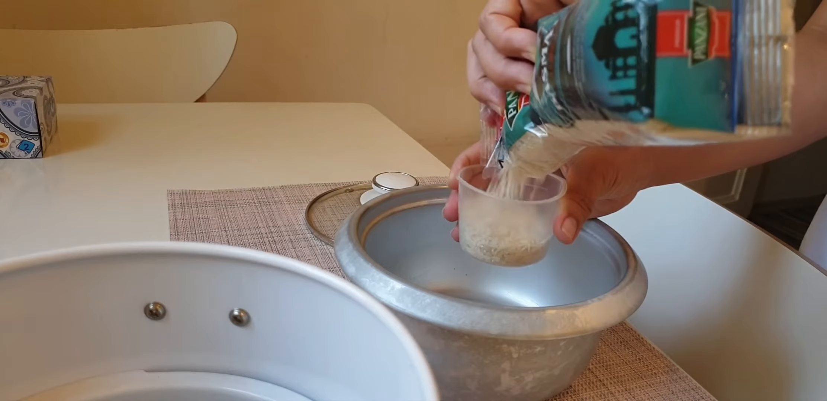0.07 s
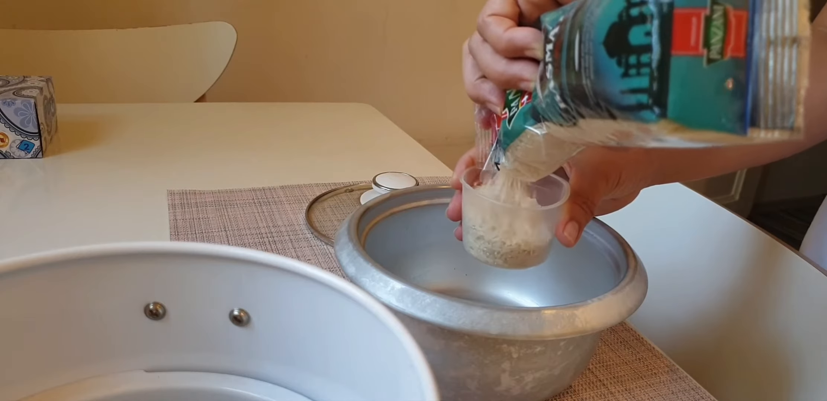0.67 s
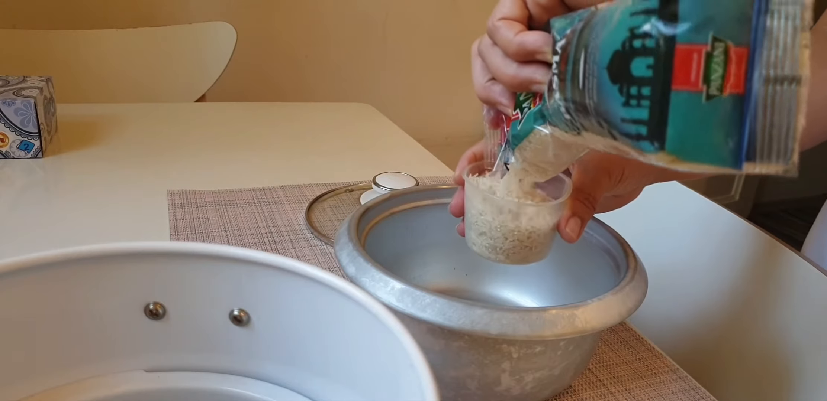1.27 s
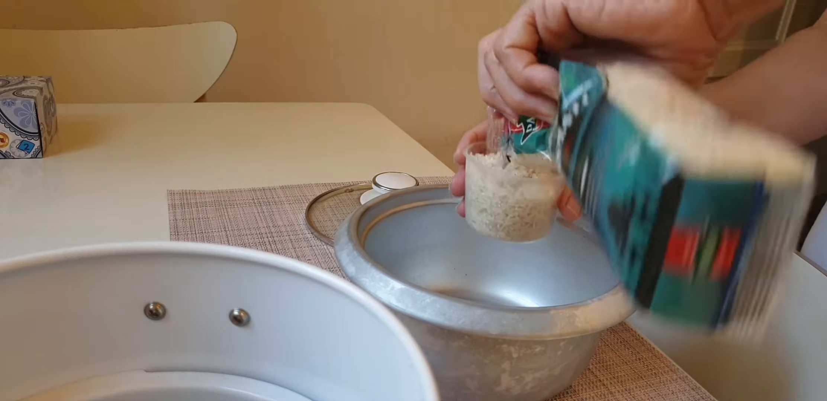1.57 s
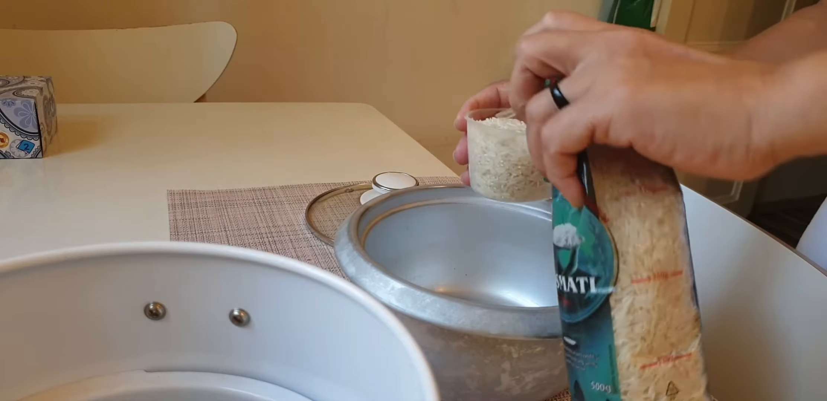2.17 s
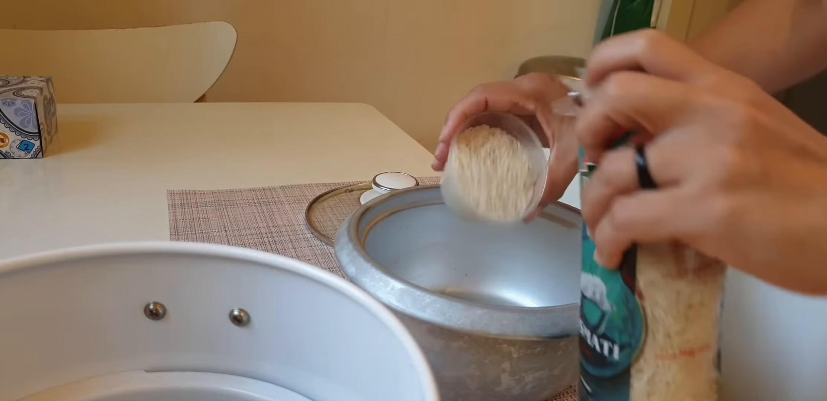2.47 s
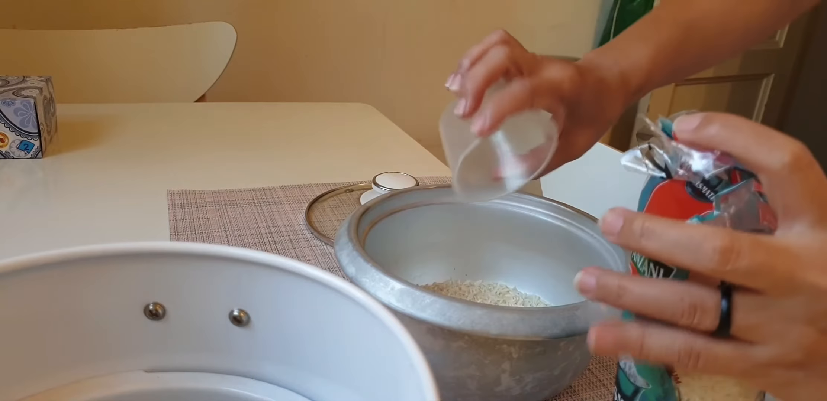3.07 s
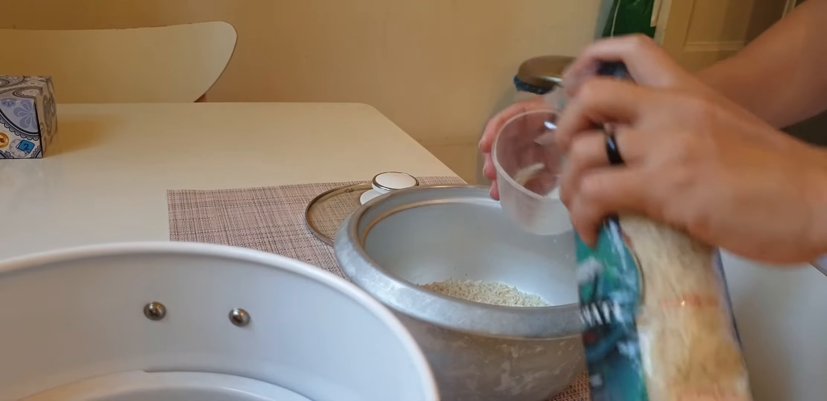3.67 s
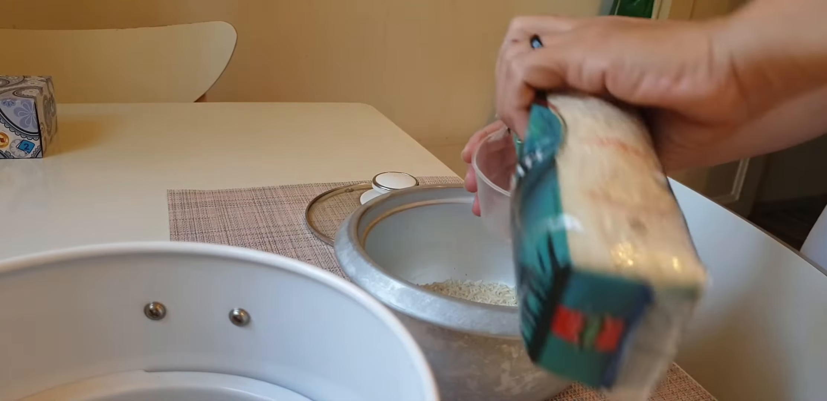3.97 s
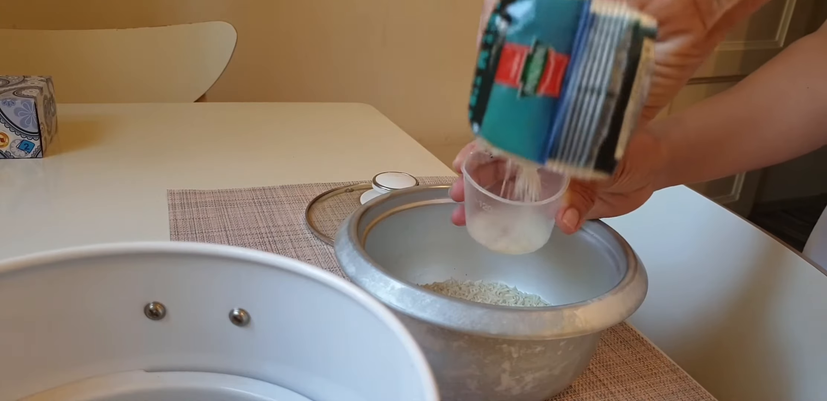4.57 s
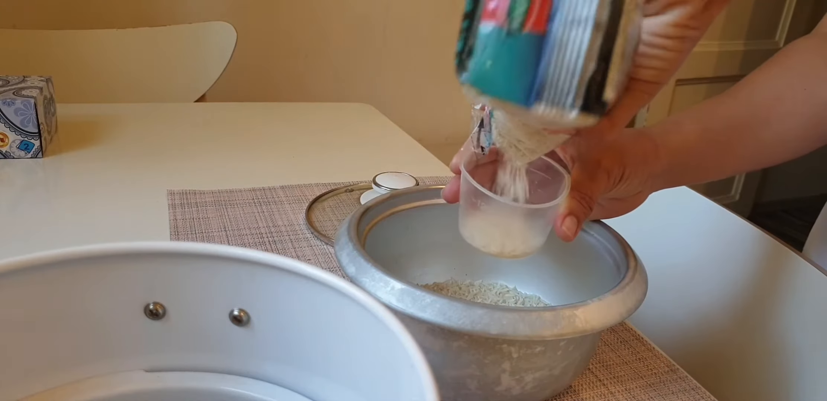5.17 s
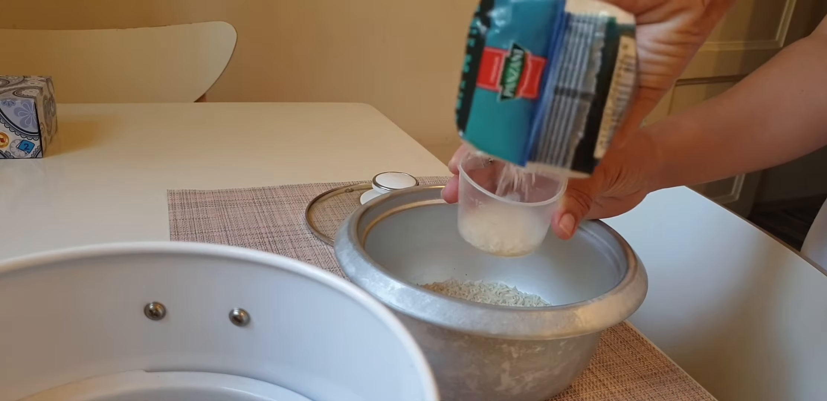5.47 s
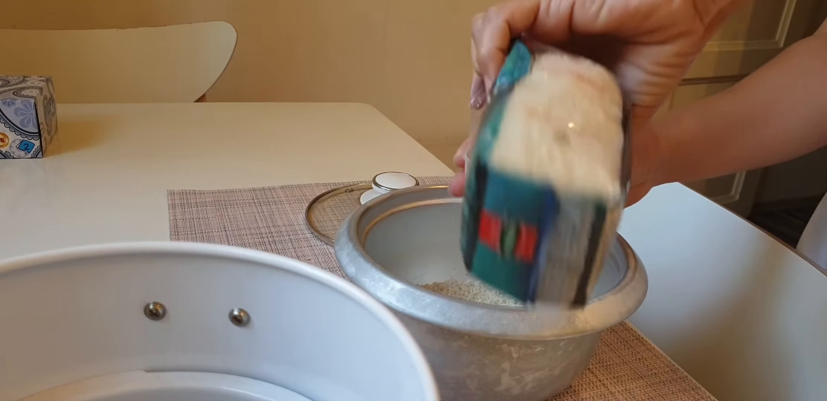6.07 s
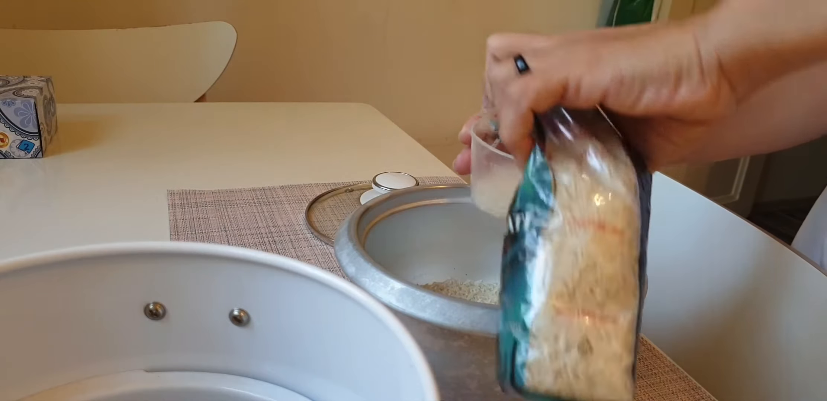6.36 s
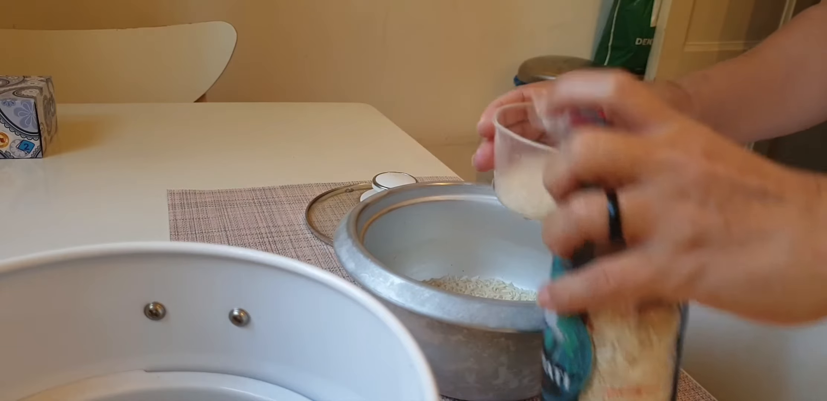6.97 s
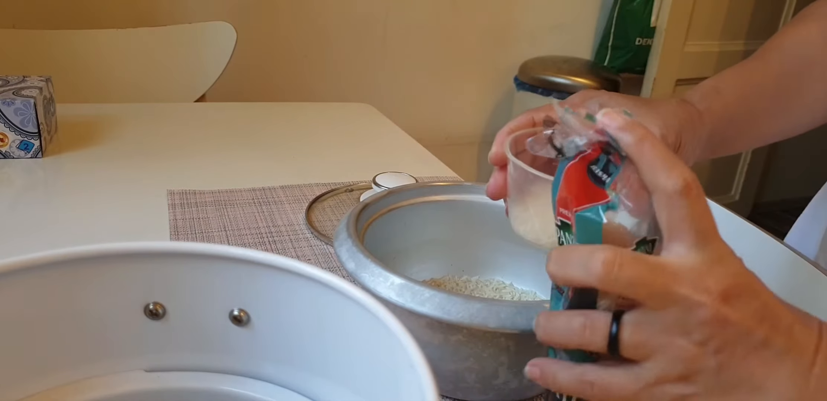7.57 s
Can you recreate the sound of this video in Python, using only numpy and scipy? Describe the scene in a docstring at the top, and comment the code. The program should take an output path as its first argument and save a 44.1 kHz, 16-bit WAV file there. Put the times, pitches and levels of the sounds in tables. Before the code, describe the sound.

Dry rice runs from a plastic bag into a plastic cup with a fine, bright patter while the bag crinkles. The cupful is tipped into an empty metal pot with a brief ringing hiss. More rice rattles into the empty cup and softens as it fills, then the bag is set down with crackles and dull thuds. The stereo microphone is close, in a quiet kitchen with a faint appliance hum.

```python
"""Pouring rice in a small kitchen

A stereo microphone stands close to the hands at the table of a quiet kitchen. Dry rice runs from a
plastic bag into a plastic cup, is tipped into an empty metal pot, and the cup is filled again.
Thousands of grain impacts hiss on the heap and ring the bare cup and pot until the rice covers them.
The bag crinkles in the hand and is set down; an appliance hums faintly behind it all."""
import sys
import numpy as np
from scipy import signal
from scipy.fft import rfft, irfft
from scipy.io import wavfile
from scipy.ndimage import uniform_filter1d

SR = 44100
rng = np.random.default_rng(int(sys.argv[2]) if len(sys.argv) > 2 else 0)


def put_to_file(sound):
    """Save the sound as 16-bit audio at rate SR, in the file named by the first command-line argument."""
    columns = np.atleast_2d(sound).T  # one column per channel
    safe = np.clip(columns, -1, 1)
    whole_steps = np.round(safe * 32767)
    wavfile.write(sys.argv[1], SR, whole_steps.astype(np.int16))


N = 344862
TIME = np.arange(N) / SR

# resonances of the cup's wall: pitch_hz, width_hz, level_db
CUP_WALL_MODES = [(726, 72, 0.5), (1260, 160, 3), (1430, 110, 10), (1540, 130, 5), (1800, 81, -2),
                  (1950, 61, -11)]
# bright spectrum of a small crease snapping in the bag's film: frequency_hz, level_db
SNAP_SPECTRUM = [(300, -59.5), (2500, -38), (5000, -6), (7700, -5), (9000, 4.5), (10800, 8), (12500, 7),
                 (15500, 1.5)]


def stream():
    """Rice falling on rice, in the cup or back down the bag: a fine, bright patter."""
    # pours: start_s, attack_s, hold_s, release_s, level_db
    pours = [(0, 0.00074, 1.28, 0.87, -49), (1.7, 0.18, 0.04, 0.15, -54.5), (3.92, 0.14, 0.29, .1, -56.5),
             (4.27, 0.19, 0.019, 1.01, -39.5), (5.2, 0.1, 0.91, 0.32, -53)]
    # a grain striking the heap: frequency_hz, level_db
    heap_spectrum = [(350, -63), (800, -13), (1500, -7), (3000, -4.5), (5600, -5), (7700, -7.5),
                     (9000, -1.5), (10200, 0), (12000, -1), (14500, -7)]
    impacts = grains(per_s=7000, scatter_db=4, clump_db=1)
    return undb(6) * gestures(pours, rise=0.9, fall=1.15) * convolve(impacts, colour(heap_spectrum))


def spurts():
    """Rice ticks over the bag's lip unevenly, in bright little rushes."""
    # start_s, attack_s, hold_s, release_s, level_db
    rushes = [(0.11, .004, 0.02, 0.024, -39.5), (0.52, 0.0034, 0.028, 0.052, -44),
              (0.665, 0.01, 0.011, 0.018, -40.5), (0.96, .004, 0.025, 0.073, -39.5),
              (1.09, 0.022, 0.023, 0.027, -43), (1.28, 0.012, .005, .02, -44),
              (1.66, 0.025, 0.015, 0.04, -40.5), (5.21, 0.15, 0.14, 0.099, -43.5),
              (5.66, 0.013, 0.0093, 0.013, -55), (6.08, 0.0054, 0.018, 0.019, -41),
              (6.18, 0.049, 0.076, .06, -44)]
    return gestures(rushes, rise=0.29, fall=3.3) * film_ticks(per_s=350, scatter_db=0.5, clump_db=2.5)


def slide():
    """Rice creeps along the thin plastic of the tilted bag and cup: a duller, coarser rustle."""
    # start_s, attack_s, hold_s, release_s, level_db
    tilts = [(0, 0.00033, 0.037, 0.054, -46.5), (0, 0.17, 0.44, 0.77, -54), (.7, 0.16, 0.27, 0.66, -50.5),
             (2.32, 0.034, 0.036, 0.3, -61), (2.39, 0.21, 0.067, 0.13, -39.5),
             (2.98, 0.0081, 0.027, 0.36, -44.5), (3.4, 0.016, 0.018, 0.49, -60),
             (3.74, 0.083, 0.2, .1, -59.5), (3.92, 0.023, 0.074, 0.58, -51), (5.08, 0.2, .03, 0.89, -48.5),
             (6.22, 0.041, .01, 0.17, -64), (6.35, 0.28, 0.035, .1, -59),
             (6.86, 0.035, 0.072, 0.048, -51.5), (6.99, 0.038, 0.079, 0.11, -38),
             (7.08, 0.058, 0.022, 0.86, -42), (7.55, 0.082, 0.14, 0.12, -61)]
    # grains on plastic: frequency_hz, level_db
    rustle_spectrum = [(120, -4.5), (400, -2.5), (750, -5.5), (1100, -3.5), (1550, 1.5), (2300, -2),
                       (2900, -2), (3800, -4.5), (5500, -6.5), (7700, -11), (10500, -6.5), (14500, -8)]
    impacts = grains(per_s=7000, scatter_db=0.5, clump_db=2.5)
    return undb(2.5) * gestures(tilts, rise=1.7, fall=2) * convolve(impacts, colour(rustle_spectrum))


def skid():
    """The tipped cupful gathers speed and patters along the cup's wall."""
    flow = undb(-41) * shape(start=2.47, attack=0.14, hold=0.082, release=0.06, rise=1.2)
    return flow * convolve(grains(per_s=2500, scatter_db=2, clump_db=1.5), ring(CUP_WALL_MODES))


def rice_into_pot():
    """The cupful hits bare metal with a bright splash, and the growing heap muffles the ring."""
    # resonances of the pot: pitch_hz, width_hz, level_db
    pot_modes = [(637, 25, 3), (738, 24, 4.5), (807, 55, -5.5), (1004, 41, -4.5), (1277, 47, -2.5),
                 (1395, 60, -9), (1480, 54, 0), (1830, 18, 9), (2100, 35, -10), (2410, 18, 9.5),
                 (2520, 52, 1), (2570, 36, -4), (2900, 55, -1), (3200, 40, -11), (3320, 36, 2),
                 (3580, 20, 4), (4140, 50, -7), (4290, 77, 1), (4460, 56, -1.5), (4530, 58, 0),
                 (4680, 35, 4.5), (5260, 22, -5), (5460, 50, -3), (5580, 54, 3), (5900, 60, -1),
                 (6080, 70, -0.5), (6250, 80, 2), (6650, 40, -2), (6860, 45, 2), (7070, 45, 2),
                 (7200, 90, -2), (7850, 50, 2.5), (7900, 36, -3), (8400, 60, 0), (8460, 60, 0),
                 (8996, 35, 10), (9180, 46, 6), (9730, 38, 13.5), (9927, 40, 6), (10000, 40, 9),
                 (10270, 84, 15.5), (10270, 45, 13), (10800, 80, 12), (11400, 110, 12.5), (11600, 51, 14),
                 (12050, 180, 7.5), (12110, 100, 9.5), (12000, 60, 11), (12916, 45, 5), (13700, 88, 5)]
    # rice landing on rice in the pot: frequency_hz, level_db
    hiss_spectrum = [(200, -37), (700, -47.5), (2000, -36), (5000, -22), (7700, -18), (9000, -6),
                     (10300, -2.5), (12200, -5), (13200, 1.5), (14500, -5)]
    # clumps that land all at once: start_s, level_db
    slaps = [(2.7156, 1), (2.739, -0.5), (2.778, 11.5)]
    lands_s, swell_s, cover_s = 2.7165, 0.048, 0.16
    first_grains_db, cover_db = -6, -4  # relative to the bulk; to the bare metal
    swell = np.clip((TIME - lands_s) / swell_s, 0, 1)
    covered = np.clip((TIME - lands_s - swell_s) / cover_s, 0, 1)
    flow = shape(lands_s, attack=0.0013, hold=swell_s, release=0.48, fall=2.7)
    flow *= undb(-19.5 + first_grains_db * (1 - swell))
    on_rice = flow * grains(per_s=9000, scatter_db=0.3, clump_db=0.4)
    for start_s, level_db in slaps:
        add(on_rice, start_s, undb(level_db) * crack(t60=0.012, size=1000))
    on_metal = flow * undb(cover_db * covered) * grains(per_s=5000, scatter_db=2.2, clump_db=1)
    metal = 0
    for share in wander(count=3, size=1100):  # each spot struck favours other modes
        modes = [(hz, width, db + 1.5 * rng.standard_normal()) for hz, width, db in pot_modes]
        signs = rng.choice([-1, 1], len(modes))
        metal += convolve(on_metal * share, ring(modes, signs=signs))
    hiss = convolve(on_rice, colour(hiss_spectrum))
    return undb(3) * hiss + undb(3.5) * band(metal, 520, 17000)


def rice_into_cup():
    """Grains patter and clumps knock in the empty cup, covering first its bottom, then its wall."""
    # clumps that land all at once: start_s, level_db
    landings = [(4.282, 35), (4.303, 30), (4.324, 29), (4.347, 28), (4.367, 28), (4.379, 25), (4.416, 22),
                (4.434, 20), (4.462, 28), (4.495, 21), (4.529, 28.5), (4.572, 34), (4.58, 24), (4.612, 21),
                (4.639, 26), (4.662, 27), (4.713, 27), (4.763, 29), (4.8, 34.5), (4.836, 31.5), (4.85, 29),
                (4.883, 31), (4.908, 30.5), (4.935, 25), (4.96, 24), (4.984, 25), (5.006, 28.5),
                (5.055, 23), (5.15, 26), (5.211, 32)]
    # resonances of the thin bottom: pitch_hz, width_hz, level_db
    bottom_modes = [(1035, 180, -5), (1820, 78, -28), (2920, 230, -25), (3750, 320, -8), (4220, 260, -11),
                    (5870, 520, -5.5), (9900, 2500, -7.5), (12400, 1300, -10)]
    lands_s = 4.281
    patter = grains(per_s=5000, scatter_db=2.2, clump_db=1.2)
    clumps = np.zeros((2, N))
    for start_s, level_db in landings:
        add(clumps, start_s, undb(level_db) * crack(t60=0.021, size=1500))
    impacts = undb(-5) * patter + clumps
    on_bottom = undb(-37) * shape(lands_s, attack=0.17, hold=0.12, release=0.98, rise=0.12, fall=2.24)
    on_wall = undb(-43.5) * shape(lands_s, attack=0.49, hold=0.2, release=0.6, rise=0.086, fall=2.4)
    on_centre = undb(-45) * shape(lands_s, attack=0.00027, hold=0.24, release=0.31, fall=1.2)
    # the note of the bottom's centre sags as the rice loads it
    note_hz, steady_s, sag_hz_per_s = 738, 0.12, 170
    loaded_s = np.clip(TIME - lands_s - steady_s, 0, 0.55)
    note = glide(impacts * on_centre, note_hz - sag_hz_per_s * loaded_s, width_hz=55)
    bottom = convolve((patter + undb(-5) * clumps) * on_bottom, ring(bottom_modes))
    wall = convolve(impacts * on_wall, ring(CUP_WALL_MODES))
    # so small a cup radiates hardly any bass
    bass_cut = signal.butter(10, 615, "high", fs=SR, output="sos")
    return signal.sosfilt(bass_cut, bottom + wall + note)


def crinkles(size=3000):
    """Each crease of the bag cracks, shakes the rice into a trail of ticks and swings a panel of film."""
    # creases snapping over: start_s, snap_db, fold_db, panel_hz, panel_db
    creases = [(0.112, -11, -21, 1750, -56), (0.178, -11, -25, 1700, -51), (0.518, -12, -41, 1540, -58),
               (0.5913, -12, -34, 1700, -55), (0.6911, -14, -32, 1700, -57), (0.7594, -18, -28, 1700, -44),
               (0.798, -3, -10, 1330, -30.5), (0.801, -4, -18, 1500, -41), (0.8708, -5.5, -16, 1940, -43),
               (0.9615, -11, -26, 1880, -39), (0.9706, -12, -30, 1880, -48), (1.2647, -11, -26, 1760, -41),
               (1.395, -24, -28, 1620, -39), (1.3675, -11, -38, 1680, -57),
               (1.4859, -3.5, -9.5, 2350, -24.5), (1.6126, -11, -32, 1625, -48),
               (1.6862, -5, -32, 2090, -41), (1.8573, -13, -19, 4800, -31.5), (1.984, -34, -20, 1700, -42),
               (2.0504, -34, -16, 1580, -55), (2.1082, -14, -20, 2530, -38), (2.4685, -8, -17, 1220, -42),
               (2.4737, -13, -19, 1600, -33), (3.08, -9, -10.5, 1760, -30.5),
               (3.485, -12.5, -26, 965, -44.5), (3.529, -14, -10.5, 1390, -24.5),
               (3.714, -15, -20.5, 1730, -24.5), (4.128, -12, -29, 2160, -31.5),
               (4.1618, -21, -8.5, 980, -37), (4.1954, -9, -12, 1800, -36.5),
               (5.3484, -17, -13.5, 1900, -32), (5.421, -10, -15, 2060, -31), (5.4363, -11, -10, 1910, -51),
               (5.6196, -25, -34, 1480, -36), (5.647, -28, -37, 1550, -35.5),
               (5.7562, -13.5, -27, 1700, -49), (5.8157, -14, -23.5, 1746, -50),
               (5.838, -9, -26, 1690, -58), (5.879, -8, -32, 1530, -40), (5.926, -6.5, -21, 1420, -41),
               (6.264, -12, -22, 2310, -44), (6.2698, -12.5, -14, 2240, -33.5),
               (6.359, -11, -40, 2200, -61), (6.4973, -15.5, -23, 1340, -69), (6.563, -9, -17, 2000, -62),
               (6.779, -42, -28.5, 1540, -40), (6.797, -38, -22, 2520, -41), (6.8688, -25, -23, 1690, -30),
               (6.903, -9.5, -15, 1660, -32), (6.993, -20, -20, 1500, -33),
               (6.9978, -4.5, -2.5, 1640, -20.5), (7.0257, -1, -21, 1610, -29),
               (7.039, 0.5, -8.5, 4600, -23), (7.2491, -2, -4, 1660, -30), (7.2514, -1, -25, 1700, -38),
               (7.3311, 1, -9, 1890, -24.5), (7.3347, -12, -20, 1850, -45), (7.405, -33, -30, 3000, -37),
               (7.5962, -21, -22, 1690, -28.5), (7.6144, -16.5, -16, 1670, -38),
               (7.7554, -28, -13, 1620, -57)]
    # a long fold sounds lower than a small crease: frequency_hz, level_db
    fold_spectrum = [(200, -27), (900, -13), (1600, 4), (2200, -3.5), (3000, 6), (4200, 5.5), (5500, 6.5),
                     (7500, -1.5), (10000, 4), (15000, -6.5)]
    snaps, folds, panels = np.zeros((3, 2, N))
    for start_s, snap_db, fold_db, panel_hz, panel_db in creases:
        pan_db = 1 + 0.5 * rng.standard_normal()  # left minus right
        sides = undb(np.array([[pan_db], [-pan_db]]) / 2)
        trail = undb(-48) * burst(0.26, size) * rng.standard_normal((2, size))
        snap = buckle(jerk_t60=0.0037, chatter_db=-8.5, size=size)
        add(snaps, start_s, sides * undb(snap_db) * (snap + trail))
        add(folds, start_s, sides * undb(fold_db) * buckle(jerk_t60=0.003, chatter_db=-7, size=size))
        add(panels, start_s, sides * undb(panel_db + 1.5) * flex(panel_hz, t60=0.0055))
    return convolve(snaps, colour(SNAP_SPECTRUM)) + convolve(folds, colour(fold_spectrum)) + panels


def crackle():
    """Sparse tiny creases give way while the hand shifts on the bag."""
    # start_s, attack_s, hold_s, release_s, level_db
    squeezes = [(0, 0.14, 0.95, .3, -53), (2.46, 0.0067, 0.036, 0.054, -39), (2.52, 0.06, 0.11, 1, -37),
                (3.36, 0.039, 0.024, 0.11, -54.5), (4.0, .2, 0.69, .2, -73),
                (5.22, 0.15, 0.044, 0.21, -39.5), (5.72, 0.096, 0.55, 0.21, -43.5),
                (6.5, 0.22, 0.19, 0.055, -62), (6.99, 0.03, 0.3, 0.15, -47)]
    clicks = convolve(grains(per_s=600, scatter_db=3, clump_db=2.5), colour(SNAP_SPECTRUM))
    ticks = film_ticks(per_s=70, scatter_db=3.5, clump_db=3)
    return gestures(squeezes, rise=0.62, fall=3.2) * (undb(-8) * clicks + undb(-6) * ticks)


def knocks():
    """Short hollow knocks, and dull thuds from the weight of the rice."""
    # knocks of the cup, of rice landing and of the bag being set down: start_s, level_db, pitch_hz
    hollow_knocks = [(1.782, -46, 1380), (2.598, -27, 1470), (2.658, -25, 1440), (2.715, -24.5, 1450),
                     (2.739, -29, 1230), (3.056, -33, 1390), (3.159, -42, 890), (3.173, -28.5, 1356),
                     (3.2, -37.5, 880), (3.242, -42.5, 1120), (3.449, -41, 1570), (3.761, -39, 840),
                     (3.931, -43.5, 1310), (5.346, -34.5, 950), (6.017, -39.5, 1120), (6.689, -39.5, 1560),
                     (7.0663, -21, 1500), (7.0881, -29, 1590), (7.097, -29, 1650), (7.104, -37, 1430),
                     (7.119, -41, 1700), (7.175, -30.5, 1600), (7.207, -35, 1940), (7.272, -31, 1750),
                     (7.276, -26, 1560), (7.287, -29, 1910), (7.321, -32, 940), (7.367, -38, 1800),
                     (7.633, -38.5, 660), (7.785, -30.5, 1630)]
    # soft blows of the heavy bag and the falling cupful: start_s, level_db, pitch_hz, t60_s
    thuds = [(0.798, -34.5, 248, 0.023), (2.336, -48, 397, 0.08), (2.714, -31, 254, 0.062),
             (2.828, -47.5, 239, 0.98), (3.975, -43, 401, 0.07), (6.62, -44.5, 145, 0.2),
             (6.997, -27, 308, 0.034), (7.025, -29.5, 460, 0.045), (7.155, -37.5, 86, 0.16),
             (7.322, -36.5, 258, 0.081), (7.54, -40, 262, 0.23)]
    out = np.zeros((2, N))
    for start_s, level_db, pitch_hz in hollow_knocks:
        add(out, start_s, undb(level_db + 3) * flex(pitch_hz, t60=0.008))
    for start_s, level_db, pitch_hz, t60_s in thuds:
        thud = band(burst(t60_s, size=12000), pitch_hz * 0.61, pitch_hz * 1.41)
        add(out, start_s, undb(level_db) * thud / np.abs(thud).max())
    return out


def settle():
    """As the bag settles on the table, the packed rice shifts in jolts that knock on its panels."""
    # start_s, attack_s, hold_s, release_s, level_db
    shifts = [(6.998, .004, 0.083, 0.043, -40), (7.14, .02, 0.1, 0.086, -50.5)]
    # panels of the filled bag: pitch_hz, width_hz, level_db
    panels = [(846, 340, -1), (1260, 340, 0.5), (1570, 220, -2), (1970, 260, -5), (2290, 300, -3)]
    jolts = struck_modes(panels, per_s=70, scatter_db=1.5, clump_db=0, size=800)
    return gestures(shifts, rise=1, fall=1) * jolts


def film_ticks(per_s, scatter_db, clump_db):
    """Tiny impacts spread over facets of taut film, each with its own short ring."""
    # pitch_hz, width_hz, level_db
    facets = [(9500, 1400, 4), (10900, 610, 1.5), (11100, 2400, -3.5), (13100, 1300, -2.5)]
    return struck_modes(facets, per_s, scatter_db, clump_db, size=400)


def struck_modes(modes, per_s, scatter_db, clump_db, size):
    """Each resonance is rung by its own train of impacts; rms 1."""
    rings = (undb(db) * convolve(grains(per_s, scatter_db, clump_db), ring([(hz, width, db)], size))
             for hz, width, db in modes)
    return unit(sum(rings))


def grains(per_s, scatter_db, clump_db):
    """Random impacts of uneven force, in little clumps; each reaches left and right unevenly."""
    hits = rng.random(N) < per_s / SR
    force = undb(scatter_db * np.minimum(rng.exponential(size=N), 2 * np.e))
    polarity = rng.choice([-1, 1], N)
    clumps = undb(clump_db * unit(smooth(rng.standard_normal(N), size=500)))
    sides = 1 + 0.96 * rng.standard_normal((2, N))
    return unit(hits * force * polarity * clumps * sides)


def crack(t60, size):
    """One sharp click and a brief chatter that differs left and right; unit energy."""
    sound = unit(stereo_burst(t60, size)) / np.sqrt(size)
    sound[:, 0] += 1.1
    return unit(sound) / np.sqrt(size)


def buckle(jerk_t60, chatter_db, size):
    """Film snaps over in a short jerk, then chatters faintly; unit energy."""
    jerk = burst(jerk_t60, size) + 1.37 * stereo_burst(jerk_t60, size)
    chatter = np.array([burst(0.041, size), burst(0.025, size)])
    return unit(unit(jerk) + undb(chatter_db) * unit(chatter)) / np.sqrt(size)


def flex(hz, t60, blur_db=-1, size=3000):
    """A thin panel swings a few times, with neighbouring modes blurring its note; peak 1."""
    t = TIME[:size]
    swing = np.sin(2 * np.pi * hz * t) * undb(-60 * t / t60) * (1 - np.exp(-t * hz))
    blur = band(burst(2.35 * t60, size), hz * 0.5, hz * 1.5)
    sound = swing / np.abs(swing).max() + undb(blur_db) * blur / np.abs(blur).max()
    return sound / np.abs(sound).max()


def ring(modes, size=6000, signs=1):
    """Unit-energy response of a struck body; each mode reaches left and right a little out of step."""
    t = TIME[:size]
    phases = rng.uniform(-1.23, 1.0, (len(modes), 1, 1)) * np.array([[1], [-1]])
    swings = [undb(db) * width * np.exp(-np.pi * width * t) * np.cos(2 * np.pi * hz * t + phase)
              for (hz, width, db), phase in zip(modes, phases)]
    return unit(np.sum(np.reshape(signs, (-1, 1, 1)) * swings, axis=0)) / np.sqrt(size)


def glide(x, hz, width_hz):
    """One resonance whose pitch moves; white noise keeps its level."""
    turn = np.exp(2j * np.pi * np.cumsum(hz) / SR)
    pole = np.exp(-np.pi * width_hz / SR)
    return np.sqrt(2 * (1 - pole ** 2)) * np.real(turn * signal.lfilter([1], [1, -pole], x / turn))


def room(x, early_db, tail_db, t60):
    """Table and pots scatter the treble at once, and the walls add a short tail."""
    wet = 0
    for share in wander(count=4, size=700):  # the echoes shift as the grains hit different spots
        early = echoes(early_db, t60=0.013, build_s=0.00033, lo_hz=2500)
        tail = echoes(tail_db, t60, build_s=0.0029, lo_hz=230)
        wet += convolve(x * share, early + tail)
    direct = np.array([np.roll(x[0], 1), x[1]])  # hands a little to the right: the left hears them later
    return (direct + wet) / np.sqrt(1 + undb(early_db) ** 2 + undb(tail_db) ** 2)


def echoes(db, t60, build_s, lo_hz, size=16000):
    """Scattered reflections that build up and die away, different on each side of the microphone."""
    scatter = band(stereo_burst(t60, size), lo_hz, 11340)
    return undb(db) * unit(scatter * (1 - np.exp(-TIME[:size] / build_s))) / np.sqrt(size)


def kitchen():
    """Low room tone and an appliance's hum, nearly the same left and right."""
    # room tone: frequency_hz, level_db
    air_spectrum = [(20, -44), (45, -12), (60, -3), (85, -3.5), (130, -2), (220, 4), (280, 0), (360, -7.5),
                    (450, -2.5), (530, -6.5), (620, -12.5), (900, -22.5), (2500, -27), (7500, -34),
                    (10000, -32), (14500, -44)]
    # overtones of the appliance: pitch_hz, level_db
    overtones = [(118.6, -74), (150.7, -78.5), (199.4, -68), (253, -70), (441, -73.5)]
    # slow drift of the whole background: time_s, level_db
    drift = [(0, 1), (1.2, 3), (5.0, -1.5), (7.82, 7)]
    air = rng.standard_normal(N) + 0.63 * rng.standard_normal((2, N))
    room_tone = undb(-60.5) * unit(convolve(air, colour(air_spectrum, size=4096)))
    hum = sum(undb(db) * np.sin(2 * np.pi * (hz * TIME + rng.random())) for hz, db in overtones)
    drone = undb(-80.5 + 2 * TIME) * np.sin(2 * np.pi * 56 * TIME)  # its deep note swells slowly
    dip_db = -16 * shape(start=4.26, attack=0.07, hold=0.47, release=0.2)  # the level sinks briefly
    level_db = np.interp(TIME, *np.transpose(drift)) + dip_db
    sides = undb([[1.2], [-1.2]])
    return (room_tone + np.sqrt(2) * (hum + drone)) * undb(level_db) * sides


def gestures(rows, rise, fall):
    """Gain of a series of hand movements; where they overlap their powers add."""
    return np.sqrt(sum((undb(db) * shape(*times, rise, fall)) ** 2 for *times, db in rows))


def shape(start, attack, hold, release, rise=1, fall=1):
    """Envelope from 0 to 1 and back, times in seconds; rise and fall bend the two slopes."""
    up = np.clip((TIME - start) / max(attack, 1e-4), 0, 1)
    down = np.clip(1 - (TIME - start - attack - hold) / max(release, 1e-4), 0, 1)
    return up ** rise * down ** fall


def wander(count, size):
    """Shares of several spots that drift at random; their powers add to 1."""
    spots = smooth(rng.standard_normal((count, N)), size)
    return spots / np.linalg.norm(spots, axis=0)


def smooth(x, size):
    """Two moving averages of size samples."""
    return uniform_filter1d(uniform_filter1d(x, size), size)


def burst(t60, size):
    """A flurry of noise that dies by 60 dB in t60 seconds."""
    return rng.standard_normal(size) * undb(-60 * TIME[:size] / t60)


def stereo_burst(t60, size):
    """A separate flurry for each side."""
    return np.array([burst(t60, size), burst(t60, size)])


def colour(points, size=1024):
    """Minimum-phase response of unit energy through (frequency_hz, level_db) points."""
    hz, db = np.transpose(points)
    bins = np.maximum(np.fft.rfftfreq(size, 1 / SR), 1)
    gains = undb(np.interp(np.log(bins), np.log(hz), db))
    cepstrum = irfft(np.log(gains))
    cepstrum[1:size // 2] *= 2
    cepstrum[size // 2 + 1:] = 0
    response = irfft(np.exp(rfft(cepstrum)))
    return response / np.linalg.norm(response)


def convolve(x, response):
    """Pass sound through an impulse response."""
    return signal.oaconvolve(np.atleast_2d(x), np.atleast_2d(response), axes=1)[:, :N]


def band(x, lo_hz, hi_hz):
    """Gentle band-pass."""
    return signal.sosfilt(signal.butter(2, [lo_hz, hi_hz], "band", fs=SR, output="sos"), x)


def add(out, start_s, sound):
    """Mix a sound in at start_s."""
    start = int(start_s * SR)
    out[:, start:start + sound.shape[-1]] += sound[..., :N - start]


def undb(db):
    """Decibels to gain."""
    return 10 ** (np.asarray(db) / 20)


def unit(x):
    """Scale to rms 1."""
    return x / np.sqrt(np.mean(x ** 2))


def scene():
    """Rice and bag close to the microphone, the kitchen behind them."""
    rice = stream() + spurts() + slide() + skid() + rice_into_pot() + rice_into_cup()
    handling = crackle() + crinkles() + knocks() + settle()
    return undb(0.5) * room(rice + handling, early_db=-7.5, tail_db=-4.5, t60=0.35) + kitchen()


def record(dry):
    """The recorder cuts the top treble steeply."""
    top_hz = 14560
    return signal.sosfilt(signal.ellip(10, 0.2, 70, top_hz, fs=SR, output="sos"), dry)


dry = scene()
out = record(dry)
put_to_file(out)
```